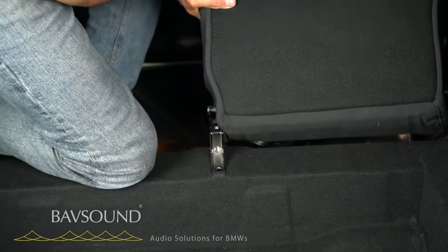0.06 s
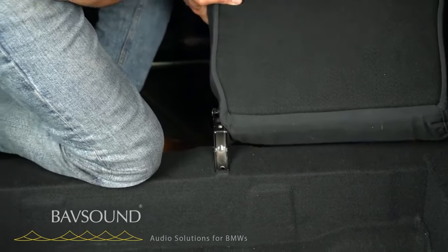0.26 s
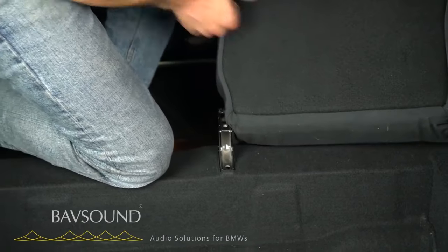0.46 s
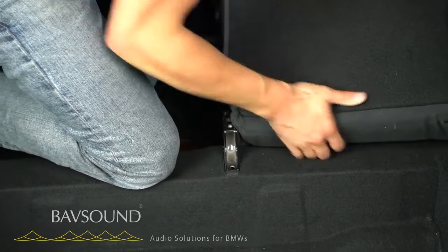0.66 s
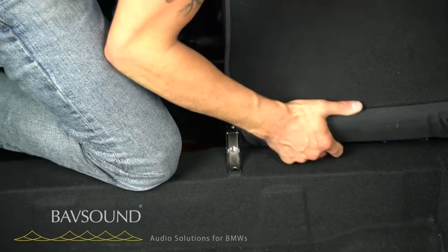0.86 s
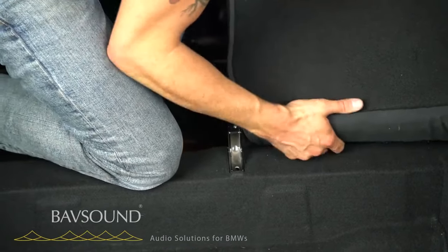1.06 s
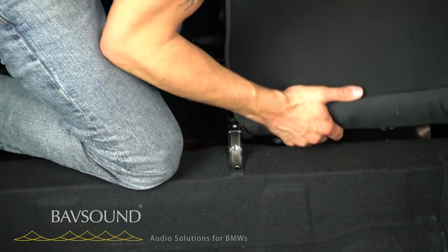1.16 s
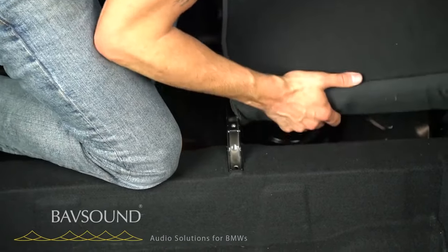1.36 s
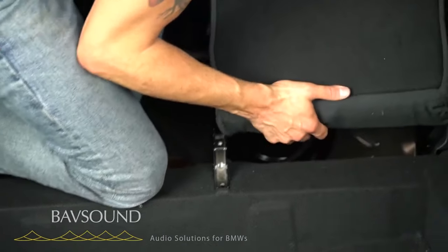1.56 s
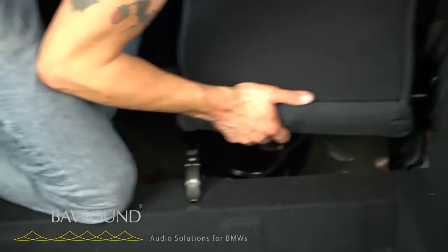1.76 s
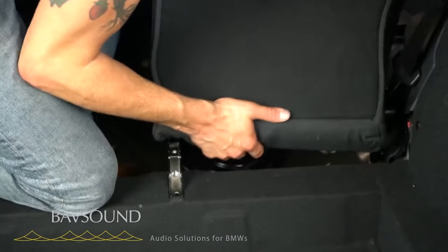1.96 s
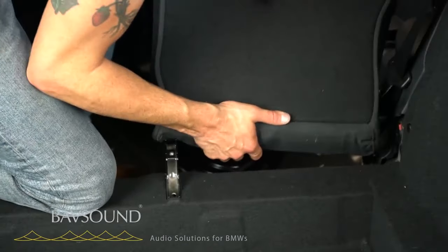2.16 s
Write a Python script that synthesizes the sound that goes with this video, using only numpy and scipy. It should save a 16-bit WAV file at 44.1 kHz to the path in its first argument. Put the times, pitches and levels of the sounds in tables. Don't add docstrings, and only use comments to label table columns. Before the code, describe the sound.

Close up inside a still car, a seat frame lands with a hard clunk and metallic tick, followed by a softer drop, quick pats with foam and cloth rubbing, then sparse bracket knocks and faint low rumble.

```python
import sys
import numpy as np
from scipy import signal
from scipy.fft import rfft, irfft
from scipy.io import wavfile
from scipy.ndimage import uniform_filter1d

SR = 44100
rng = np.random.default_rng(int(sys.argv[2]) if len(sys.argv) > 2 else 0)


def dump_mix(stems):
    frames = np.atleast_2d(stems).T
    limited = np.clip(frames, -1, 1)
    pcm = np.round(limited * 32767).astype(np.int16)
    wavfile.write(sys.argv[1], SR, pcm)


def undo_db(level):
    steps = np.asarray(level, float) / 20
    return 10 ** steps


N = 97020

# (frequency [Hz], level [dB per Hz])
AIR_SPECTRUM = [(120, -24), (200, -4), (644, 0), (1180, -22.5), (2450, -23), (6450, -36), (11600, -32),
                (13700, -52), (15800, -63)]
# (time [s], level [dB])
SHELL_LOAD = [(0.0, -67), (0.16, -54), (0.3, -49), (0.63, -55.5), (0.79, -56), (0.95, -63.5), (1.1, -58),
              (1.28, -53), (1.45, -56.5), (1.91, -57.5), (2.06, -47.5), (2.2, -68.5)]
# (frequency [Hz], level [dB per Hz])
RUMBLE_SPECTRUM = [(20, -19), (35, -5.5), (58, -2.5), (100, -9.5), (160, -12.5), (250, -17), (420, -16.5)]
# (frequency [Hz], level [dB], T60 [s])
SHELL_MODES = [(54, -13, 0.32), (75.5, -0.5, 0.23), (102.4, 0.5, 0.3), (168.8, -6, 0.131)]
# (time [s], level [dB], pitch factor [1], ring factor [1])
WEIGHT_SHIFTS = [(0.102, -47, 1.1, 0.45), (0.154, -47, 1.3, 0.74), (.316, -18, 0.763, 0.22),
                 (.345, -47, 1.8, 0.39), (0.407, -48, 0.96, 1), (0.442, -48, 0.66, 0.35),
                 (.51, -47, 0.93, 0.28), (0.606, -45.5, 2.26, 0.24), (.9, -56, 0.98, 0.25),
                 (1.316, -44, 0.97, 0.27), (1.606, -48, 0.62, 0.36), (1.631, -52, 1.3, 0.22),
                 (2.013, -43, 1.28, 0.28), (2.057, -51, .9, .3)]
# (time [s], level [dB])
HAND_SLIDE = [(0, -86), (.08, -79.5), (.16, -87), (.26, -65.5), (.43, -79.5), (.54, -73), (.575, -73),
              (.622, -62), (.642, -80), (.72, -72), (.81, -70.5), (.845, -59), (.89, -66.5), (1.19, -66.5),
              (1.22, -75.5), (1.27, -69.5), (1.6, -81.5), (2.2, -88.5)]
# (frequency [Hz], level [dB per Hz])
CLOTH_SPECTRUM = [(880, 3.5), (1500, -1.5), (2260, -14), (3610, -12), (5710, -14.5), (11300, -17.5),
                  (12600, -16.5), (14200, -19.5), (16300, -17.5)]
# (time [s], length [s], level [dB], centre [Hz])
SHORT_BRUSHES = [(0.035, .07, -90, 12500), (0.07, 0.021, -71, 1860), (0.163, 0.041, -80, 14500),
                 (0.288, 0.11, -61.5, 2030), (0.456, 0.033, -64, 1430), (0.512, 0.066, -68, 14000),
                 (0.506, 0.057, -69.5, 4900), (0.579, 0.066, -61.5, 1490), (0.588, 0.057, -63, 13200),
                 (0.714, 0.18, -69.5, 6200), (0.758, 0.11, -46.5, 776), (0.947, 0.31, -65.5, 14100),
                 (1.237, 0.068, -66.5, 1830), (1.46, 0.05, -57, 580), (1.458, 0.053, -79, 3000),
                 (1.511, .03, -72, 13400), (1.627, 0.011, -68, 1460), (1.664, 0.041, -72.5, 2240),
                 (1.656, 0.11, -82, 13500), (1.723, 0.04, -57.5, 700), (1.904, .1, -89, 15000),
                 (2.046, 0.081, -82.5, 13100), (2.097, 0.067, -60, 450)]
# (frequency [Hz], width [Hz], level [dB])
TRIM_RESONANCES = [(3000, 2100, -1), (4100, 1600, 0.5), (8040, 1800, -3.5)]
# (time [s], level [dB], brightness above 1 kHz [dB per octave])
FOAM_DRAG = [(0, -64, -1), (.12, -55, -31), (.36, -55, 5), (.44, -63.5, 1.5), (.62, -58.5, 11.5),
             (.65, -79.5, 17.5), (.70, -63.5, -22), (.74, -42, -4), (.85, -41.5, 9), (.99, -51, -0.5),
             (1.17, -59, -58), (1.22, -60.5, 0), (1.265, -57.5, -27), (1.44, -69.5, 7), (1.69, -59.5, -13),
             (1.86, -75, -5), (1.97, -54.5, -2.5), (2.2, -69.5, -7)]
# (frequency [Hz], width [Hz], level [dB])
FOAM_RESONANCES = [(350, 190, -5.5), (633, 203, -0.5), (769.4, 248, 2), (1174, 137, -3), (1573, 256, -6.5),
                   (2320, 310, -15), (2807, 180, -22.5)]
# (time [s], level [dB],
# centre [Hz], T60 [s])
BRIGHT_BURSTS = [(0.226, -65, 5960, .012), (0.2707, -37, 4840, 0.046), (0.2753, -47, 12500, 0.014),
                 (0.276, -32.5, 12800, 0.0037), (1.187, -57.5, 6160, 0.026), (1.368, -57.5, 5200, 0.012),
                 (1.523, -65, 9500, 0.014), (1.521, -65, 4750, .02), (0.287, -64.5, 5200, 0.24),
                 (.395, -57, 2060, 0.033), (1.803, -81, 3500, 0.0076), (2.01, -62.5, 2970, 0.036),
                 (2.032, -53, 1500, 0.031), (2.055, -67.5, 8800, 0.012)]

# (time [s], strength [dB], pitch factor [1], ring factor [1], shell thump [dB])
CUSHION_PATS = [
    (.645, -42.5, 0.72, 1, -56),
    (.818, -32, 1.04, 0.8, -66),
    (.836, -26.5, 1.02, 0.9, -62),
    (.853, -37, 0.91, 0.33, -42),
    (.938, -33, 1.297, 1, -69),
    (.955, -44.5, 1.18, 1, -56),
    (1.558, -43, 0.38, 0.93, -54.5),
]
BRACKET_KNOCKS = [(.092, -48, 1.25, 0.5, -76), (.115, -50.5, 1.04, 1.8, -69),
                  (.705, -44.5, 1.37, 0.41, -51), (1.190, -35, 1.35, 0.46, -77),
                  (1.367, -34, 1.09, 0.61, -53), (1.803, -29, 1, 0.51, -59), (1.885, -54.5, 1.5, 0.97, -73),
                  (1.968, -44, 1.07, 0.81, -63), (2.031, -31.5, 1.14, 2.3, -64),
                  (2.0325, -37.5, 0.722, 0.53, -62), (2.056, -36.5, 1.17, 0.17, -78),
                  (2.179, -49.5, 1.16, 0.61, -56), (1.1935, -54, 1.24, 0.5, -64),
                  (1.3715, -41.5, 1.76, 0.52, -55), (2.0365, -37, 1.6, 1.2, -51),
                  (1.8125, -40, 1.008, 0.92, -60)]
FRAME_DROPS = [
    (.2265, -17.5, 1.0, 0.99, -28.5),
    (.2315, -19, 0.9, 0.31, -38),
    (.7285, -29, 0.91, 0.34, -36),
    (.7445, -30, 0.88, .6, -48),
]
FRAME_SLAMS = [
    (.2705, -19, 1.5, 0.47, -56),
    (.2735, -13, 1.26, 0.5, -28.5),
    (.2790, -15.5, 1.03, 0.78, -62),
    (.2818, -18, 1.006, 1, -60),
    (.2865, -27.5, 0.667, 0.9, -25.5),
]

# (frequency [Hz], level [dB], T60 [s])
CUSHION_MODES = [(162.6, -2, 0.071), (211, -8.5, 0.076), (258, 2.5, 0.033), (332, -7, 0.021)]
BRACKET_MODES = [(165, -17, 0.045), (249, -8, 0.062), (366.4, -2.5, 0.078), (615, 2.5, 0.03),
                 (820, -4, 0.047), (970, -4, 0.021), (1327, -9.5, 0.027), (1770, -22, 0.12)]
DROP_MODES = [(168, -1.5, 0.1), (293, 8, 0.05), (422, -0.5, 0.057), (652, 3.5, 0.079), (845, -1.5, 0.065),
              (1250, -9, 0.058), (1740, -15, 0.066), (2560, -10.5, 0.014)]
SLAM_MODES = [(180, -8.5, 0.083), (317, -4, 0.068), (499, 5, 0.022), (753, -9.5, 0.028), (936, -5, 0.022),
              (1165, -6.5, 0.023), (1660, -6, 0.015), (2380, -17.5, 0.035)]


def evened(x):
    return x / np.sqrt(np.mean(x ** 2) + 1e-20)


def along(curve, column=1):
    points = np.array(curve)
    return np.interp(np.arange(N) / SR, points[:, 0], points[:, column])


def add(mix, s, sound):
    part = mix[round(s * SR):][:len(sound)]
    part += sound[:len(part)]


def resonate(x, hz, width):
    pole = np.exp((2j * np.pi * hz - np.pi * width) / SR)
    return 2 * signal.lfilter([1 - abs(pole)], [1, -pole], x).real


def resonant_band(x, hz, width):
    return evened(resonate(resonate(x, hz, width), hz, width))


def coloured(spectrum, patchy_db, flicker_db):
    frames = N // 128 + 6
    real, imaginary, patches = rng.standard_normal((frames, 257, 3)).T
    patches = uniform_filter1d(patches, size=8, axis=0)
    patches = evened(uniform_filter1d(patches, size=16, axis=1))
    flicker = evened(uniform_filter1d(rng.standard_normal(frames), size=4))
    z = (real + 1j * imaginary) * undo_db(patchy_db * patches + flicker_db * flicker)
    noise = signal.istft(z, nperseg=512, noverlap=384)[1][:N]
    hz, db = np.transpose(spectrum)
    fine_hz = np.fft.rfftfreq(N, 1 / SR)
    gain_db = np.interp(np.log(fine_hz + 1), np.log(hz + 1), db, left=-80, right=-80)
    return evened(irfft(rfft(noise) * undo_db(gain_db), N))


def ring(modes, pitch=1, stretch=1):
    t = np.arange(SR // 2) / SR
    out = np.zeros(len(t))
    for k, (hz, db, t60) in enumerate(modes):
        decay = undo_db(db - 60 * t / (t60 * stretch))
        out += (-1) ** k * decay * np.sin(2 * np.pi * hz * pitch * t)
    return out


def still_air():
    return undo_db(-66) * coloured(AIR_SPECTRUM, 2, 2)


def cabin(x):
    t60, density, dull = 0.14, .06, 0.19
    t = np.arange(SR // 3) / SR
    taps = rng.choice([-1., 1.], len(t)) * (rng.random(len(t)) < density)
    taps = taps * undo_db(-60 * t / t60) * (t > .003)
    taps = signal.lfilter([1 - dull], [1, -dull], taps)
    return signal.fftconvolve(x, taps / np.linalg.norm(taps))[:N]


def rumble():
    return undo_db(along(SHELL_LOAD)) * coloured(RUMBLE_SPECTRUM, 1.0, 0.47)


def bumps():
    out, push = np.zeros(N), np.hanning(200) / 100
    for s, db, pitch, stretch in WEIGHT_SHIFTS:
        add(out, s, undo_db(db) * np.convolve(ring(SHELL_MODES, pitch, stretch), push))
    return out


def slide():
    return undo_db(along(HAND_SLIDE) + 6.0) * coloured(CLOTH_SPECTRUM, 1.7, 0.61)


def brushes():
    out = np.zeros(N)
    for s, length, db, hz in SHORT_BRUSHES:
        t = np.arange(0, length, 1 / SR)
        tone = resonant_band(rng.standard_normal(SR // 3), hz, 0.56 * hz)
        add(out, s, undo_db(db) * np.sin(np.pi * t / length) * tone[:len(t)])
    return out


def swish():
    length, squeak_hz, arch = .16, 12500, 0.15
    out, t = np.zeros(N), np.arange(0, length, 1 / SR)
    noise = rng.standard_normal((2, len(t)))
    speed = np.sin(np.pi * t / length)
    body = sum(undo_db(db) * resonant_band(noise[0], hz, width) for hz, width, db in TRIM_RESONANCES)
    turns = np.cumsum(squeak_hz * (1 - arch * (1 - speed) * 2)) / SR
    fuzz = evened(uniform_filter1d(noise[1], size=300))
    squeak = fuzz * (np.sin(2 * np.pi * turns) + .7 * np.sin(2 * np.pi * 1.135 * turns))
    add(out, 1.87, speed * (undo_db(-76) * body + undo_db(-81) * squeak))
    return out


def drag():
    slips_per_s, spread_db, slip_share = 3000, 2.2, .6
    strength = undo_db(spread_db * np.minimum(rng.exponential(1, N), 4))
    slips = strength * (rng.random(N) < slips_per_s / SR) * rng.choice([-1., 1.], N)
    hiss = coloured([(20, 0), (20000, 0.024)], 0.22, 1.24)
    drive = slip_share * evened(slips) + (1 - slip_share) * hiss
    brightness = along(FOAM_DRAG, column=2)
    body = np.zeros(N)
    for hz, width, db in FOAM_RESONANCES:
        octaves = max(np.log2(hz / 1000), 0)
        body += undo_db(db + octaves * brightness) * resonant_band(drive, hz, width)
    return undo_db(along(FOAM_DRAG) - 7.0) * body


def ticks():
    out, t = np.zeros(N), np.arange(2000) / SR
    for s, db, hz, t60 in BRIGHT_BURSTS:
        burst = resonant_band(rng.standard_normal(len(t)), hz, .7 * hz)
        add(out, s, undo_db(db - 60 * t / t60) * burst)
    return out


def blows(events, modes, grit, soft_ms):
    out, t = np.zeros(N), np.arange(1500) / SR
    pad = t[:200] * np.exp(-t[:200] * 1000 / soft_ms)
    thump = np.convolve(ring(SHELL_MODES), np.hanning(120) / 60)
    for s, db, pitch, stretch, thump_db in events:
        chatter = rng.standard_normal(len(t)) * np.exp(-t * 1000 / 3)
        force = np.convolve((t == 0) + grit * chatter, pad)
        sound = signal.fftconvolve(ring(modes, pitch, stretch), force)
        add(out, s, undo_db(db) * sound / abs(sound).max())
        add(out, s, undo_db(thump_db) * thump)
    return out


def impacts():
    hits = blows(FRAME_DROPS, DROP_MODES, grit=.07, soft_ms=0.064)
    hits += blows(FRAME_SLAMS, SLAM_MODES, grit=.07, soft_ms=0.087)
    hits += blows(BRACKET_KNOCKS, BRACKET_MODES, grit=.07, soft_ms=0.15)
    hits += blows(CUSHION_PATS, CUSHION_MODES, grit=0.018, soft_ms=0.29)
    return hits


def scene():
    hits = impacts()
    background = still_air() + rumble() + bumps()
    rubbing = slide() + brushes() + swish() + drag()
    return (background + rubbing + ticks() + hits + undo_db(-13.5) * cabin(hits))[None]


def gated(x):
    gate_hz, gate_db = 12000, -124
    hz, _, z = signal.stft(x, SR, nperseg=2048, scaling="psd")
    bands = z[:, :1024].reshape(1, 32, 32, -1)
    quiet = 2 * np.mean(abs(bands) ** 2, axis=2) < undo_db(2 * gate_db)
    z[:, :1024] *= 1 - np.repeat(quiet, 32, axis=1) * (hz[:1024, None] > gate_hz)
    return signal.istft(z, SR, nperseg=2048, scaling="psd")[1][:, :N]


def roll_off(x):
    return signal.sosfilt(signal.butter(12, 16450, fs=SR, output="sos"), x)


def record(dry):
    edge = signal.firwin(511, 15780, window=("kaiser", 9), fs=SR)
    mix = gated(signal.oaconvolve(dry, edge[None], "same"))
    return roll_off(mix)


dry = scene()
out = record(dry)
dump_mix(out)
```